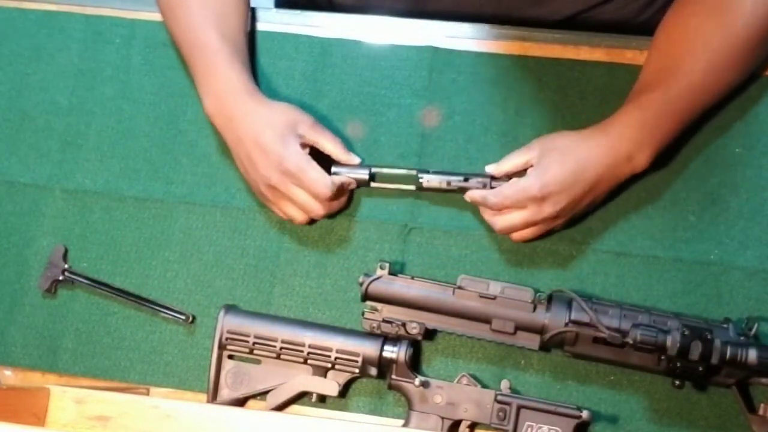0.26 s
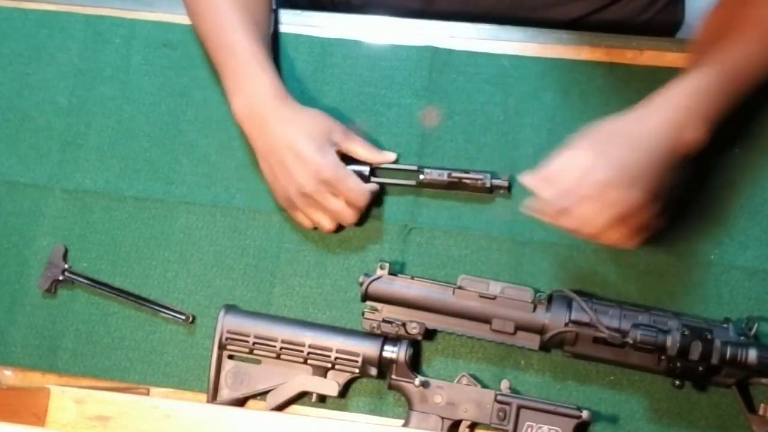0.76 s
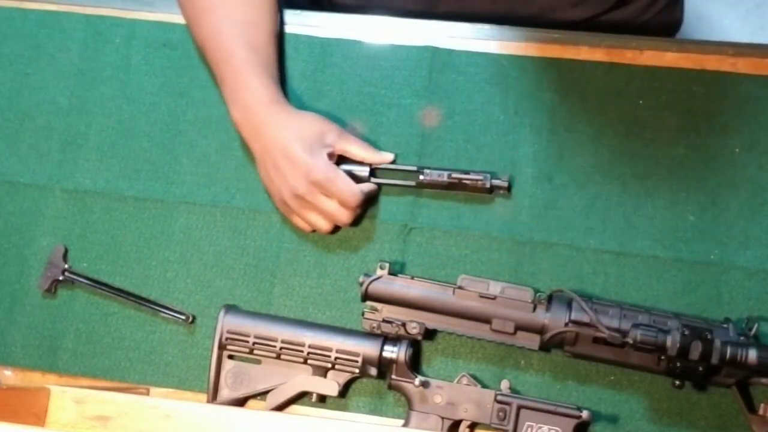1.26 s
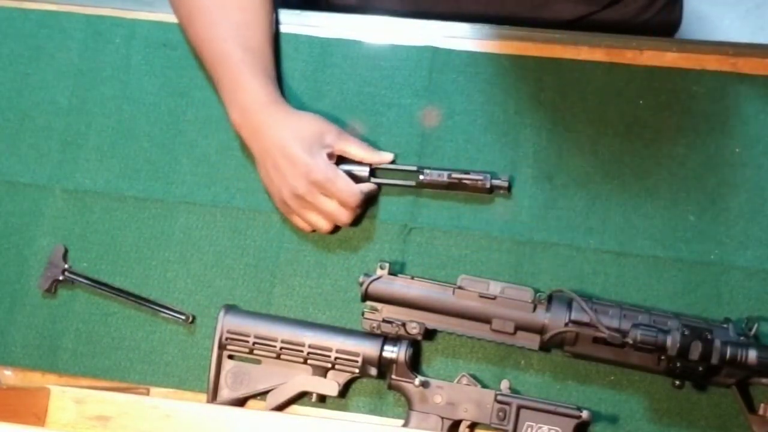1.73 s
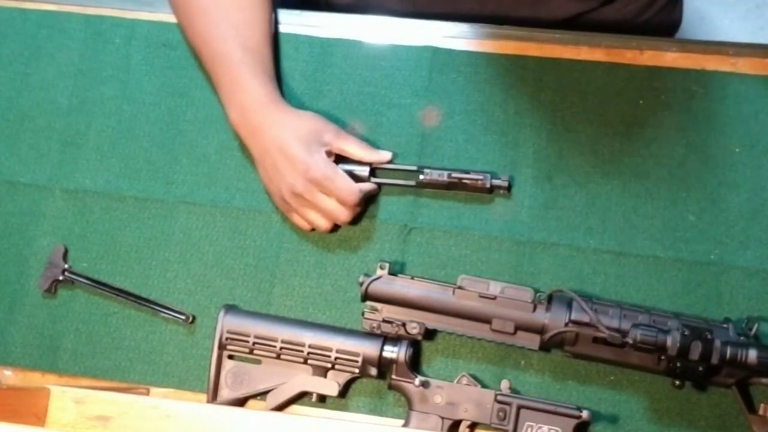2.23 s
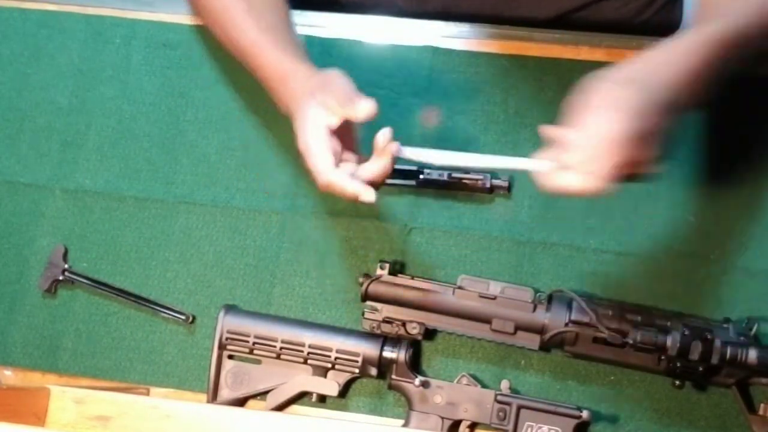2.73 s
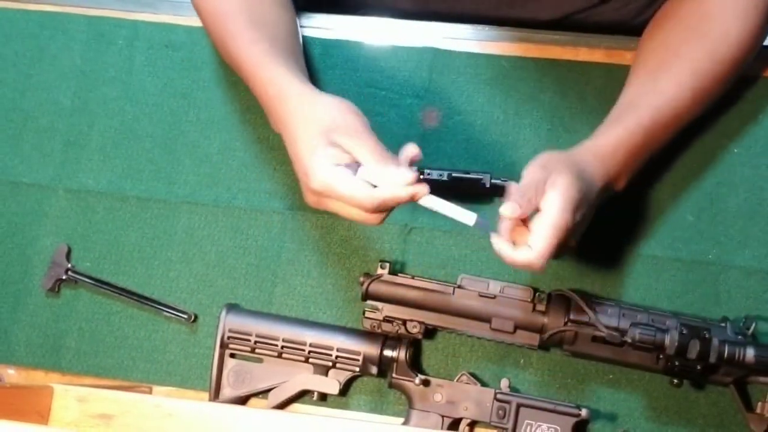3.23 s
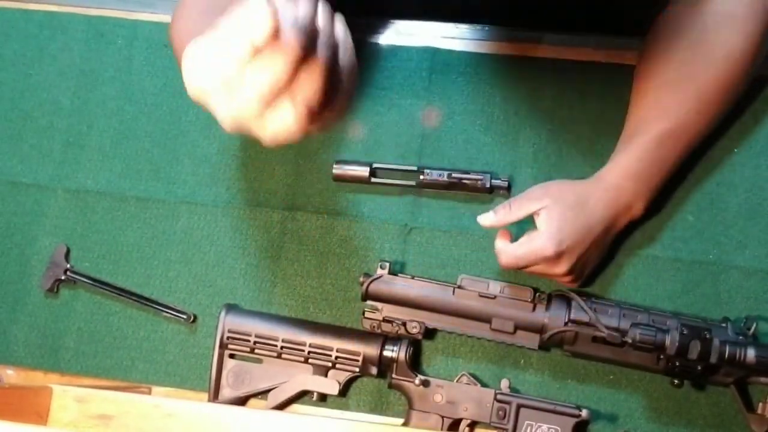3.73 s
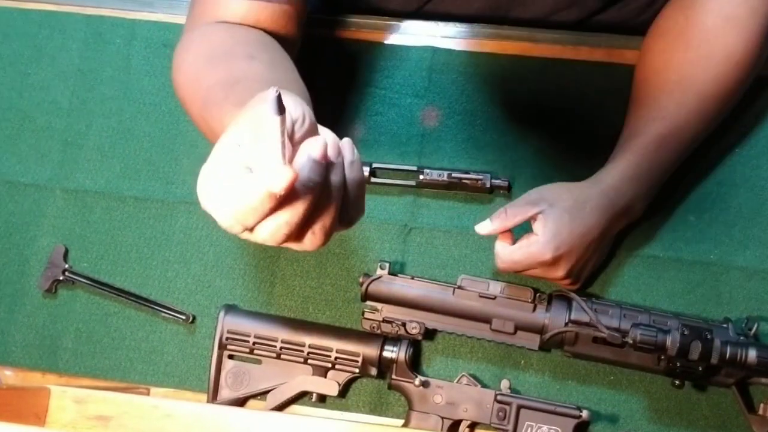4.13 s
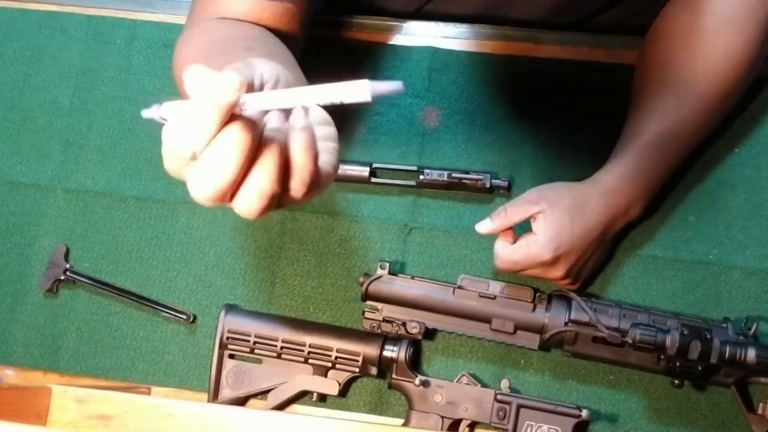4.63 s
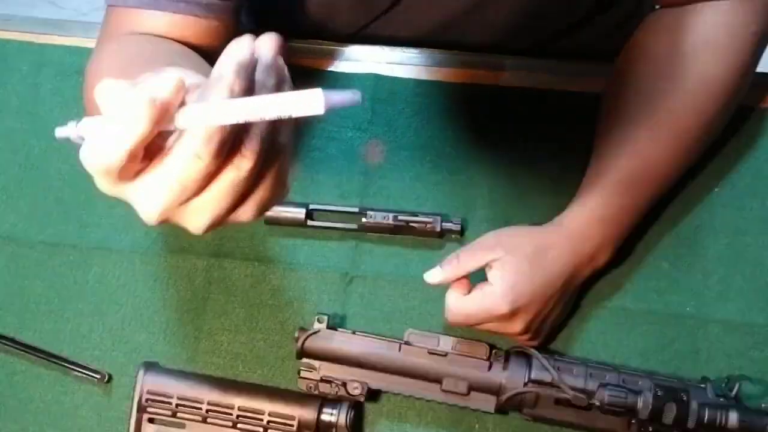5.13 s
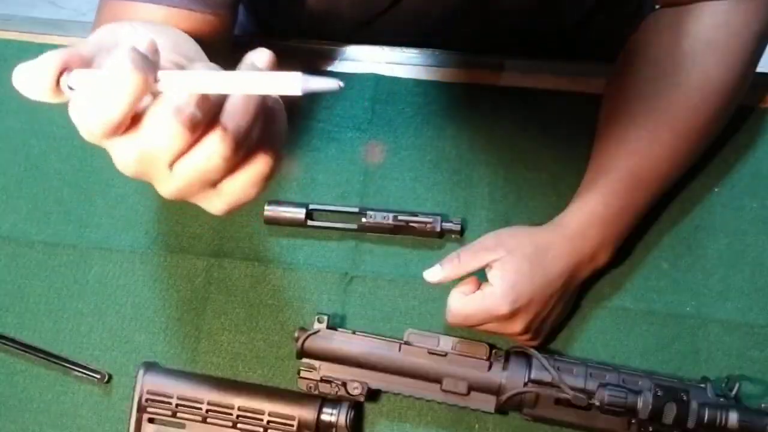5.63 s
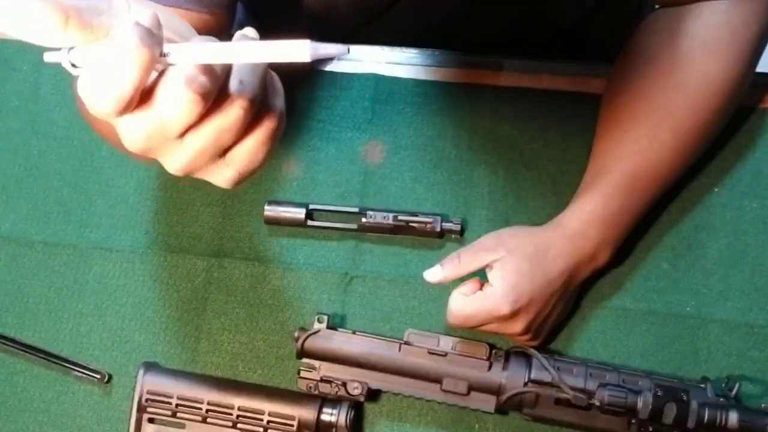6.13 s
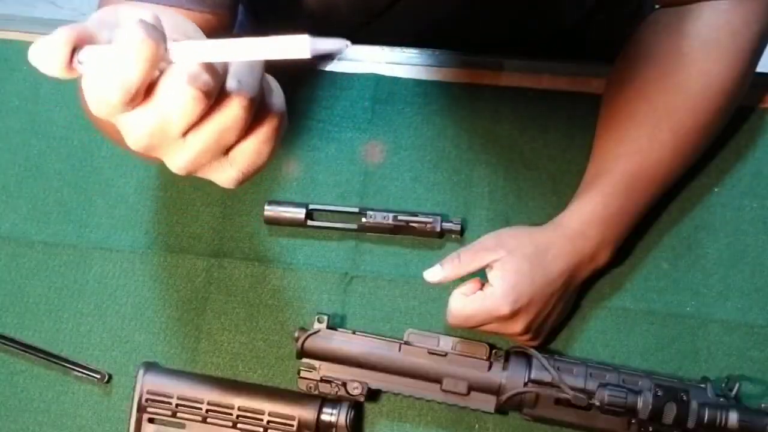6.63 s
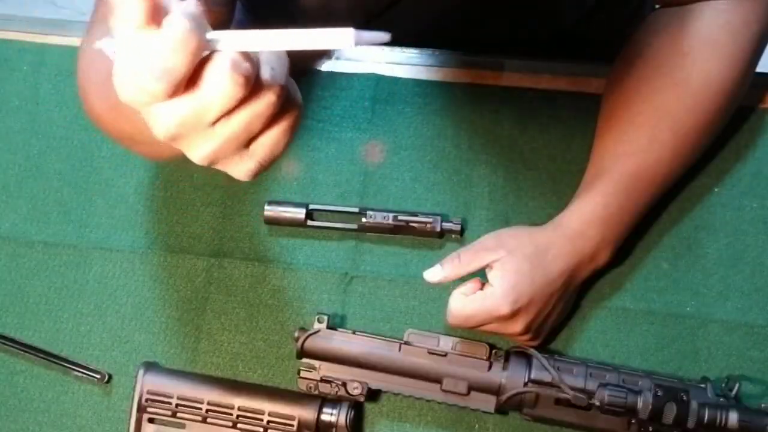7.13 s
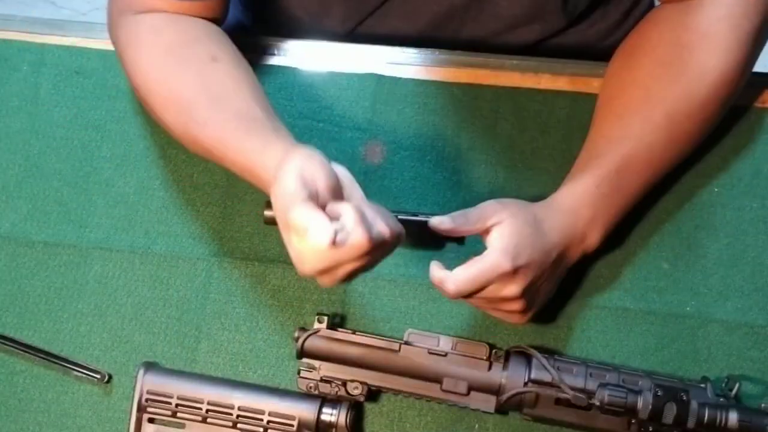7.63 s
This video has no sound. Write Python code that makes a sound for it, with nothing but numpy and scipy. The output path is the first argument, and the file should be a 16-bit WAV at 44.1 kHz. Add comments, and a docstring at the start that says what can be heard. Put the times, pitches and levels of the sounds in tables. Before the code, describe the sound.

A deep, steady hum near 60 Hz runs throughout, with soft rumble, a slow faint beating, a light rush of air and thin treble whines. At 0.8 s there is one very faint knock. From 1.2 s a hand rummages in a wooden tray: dull hollow knocks and rough sliding, thickening to the strongest woody clatter around 1.7-1.85 s. More knocks, brighter scraping and small hard ticks follow from 2.05 to 2.4 s, then fade. Two light ticks come at 2.8 s, and a barely audible knock at 3.7 s. Mostly hum remains until a tiny dry fingertip pop at 5.15 s. Crisp plastic pen clicks follow: a double at 5.63, a sharper cluster at 5.8, a single at 6.6, and a strong bright snap at 6.86 s. At 7.67 s the pen tip taps steel with a short high ring. The close stereo sound has a short, dry room echo.

```python
"""A plastic push-button pen is handled and clicked close to a two-port microphone: chatter rings its barrel.
A fingertip pops off the barrel once, and last the pen tip touches steel. Before the pen, a hand rummages
in a wooden tray off to one side; knocks and a scrape shake its modes (natural notes), and small things tick.
Behind it all, in a quiet workroom, two motors at slightly different speeds hum and beat in steady tones,
with thin treble whines; their rumble and rush of air are coloured noise."""
import sys
import numpy as np
from scipy import signal
from scipy.fft import rfft, irfft
from scipy.io import wavfile
from scipy.ndimage import uniform_filter1d

SR = 44100
rng = np.random.default_rng(int(sys.argv[2]) if len(sys.argv) > 2 else 0)


def master(y):
    """Save y as 16-bit WAV."""
    cut = np.clip(np.atleast_2d(y).T, -1, 1)
    pcm = np.round(cut * 32767)  # scale
    wavfile.write(sys.argv[1], SR, pcm.astype(np.int16))


N = 346934
TIME = np.arange(N) / SR
BINS = np.maximum(np.arange(N // 2 + 1) * SR / N, 1)   # the pitches of a spectrum, Hz

# the room's echoes by pitch: f/Hz, t60/s (time to fade by 60 dB), relative level/dB
ROOM = [(200, 0.1, -16), (595, 0.11, 0), (1700, 0.16, 1), (3400, 0.13, -4), (6800, 0.07, -3.5),
        (13500, 0.19, -0.5)]
ROOM_APART_HZ = 900   # below this the echoes grow alike in the two ports
TRAY_ROOM_DB, PEN_ROOM_DB, POP_ROOM_DB = -0.5, -0.5, -9   # how strongly each source feeds the echoes

# the base tone of the first motor: t/s, level/dB
HUM_LEVEL = [(0.15, -39.5), (2.88, -41.5), (4.46, -41), (4.65, -40.5), (6.96, -39), (7.7, -39.5)]
HUM_HZ, HUM_LAG_RAD = 59.286, 0.24   # the left port lags
# further steady tones of both motors, the lowest from the second: f/Hz
OVERTONE_HZ = [118.83, 296.4, 533.8, 592.9]
# the same tones: level/dB, wavering/dB
OVERTONES = [(-70, 1), (-77.5, 7.5), (-97.5, 10.5), (-91, 6)]
BEATING_HZ = 178.26   # a tone of the second motor, just above the first one's third overtone, beats with it
THIRD_DB, BEATING_DB, PAIR_FADE_DB_PER_S, BEAT_DIP_S = -68, -62.5, 1, 2.75   # levels hold at the dip
# colour of the low rumble: f/Hz, relative level per Hz/dB
RUMBLE_COLOUR = [(12, -20), (25, -3.5), (40, 3.5), (80, -1), (110, -7), (160, -8), (250, -9), (310, -9.5),
                 (400, -22), (630, -27), (1000, -33), (1300, -41), (2200, -44)]
# colour of the rush of air: f/Hz, relative level per Hz/dB
RUSH_COLOUR = [(880, -29), (1500, -22.5), (2370, -22), (3130, -24.5), (3600, -10.5), (4710, -14),
               (4860, -10.5), (5260, -11), (6350, -8), (6680, -3), (7090, -10), (7530, -9), (9180, -14.5),
               (12600, -13), (16200, -18.5)]
RUMBLE_DB, RUSH_DB = -57.5, -60.5
# centres of the narrow whines: f/Hz
WHINE_HZ = [3973, 4980, 5513, 5556, 5960, 6155, 6461, 6641, 6699, 6761, 6850, 7057, 7175, 8016, 8253, 8710]
# the same whines, noise in narrow resonances: width/Hz, level/dB
WHINES = [(12.2, -102), (28.4, -72), (15.9, -75), (14.9, -83), (36, -72), (79, -74), (40.4, -78),
          (11.5, -81), (11.8, -75.5), (15, -73.5), (48.3, -60), (12, -83.5), (12.3, -73.5), (15.4, -80),
          (16.8, -77.5), (19.9, -103)]
# how alike the steady noise is in the two ports: f/Hz, likeness (1 same, 0 unrelated, -1 opposite)
LIKENESS = [(60, 1), (150, 0.75), (380, 0.44), (950, -0.35), (2380, 0.029), (5980, 0.038), (15000, -0.047)]
# how the steady noise leans to one side: f/Hz, left minus right/dB
LEAN = [(60, -4.5), (110, 3), (200, -2), (380, -2.5), (700, -3), (1290, 1), (2380, 2), (4400, -3.5),
        (8120, -5.5), (15000, -2.5)]

# knocks in the tray: t/s, drive level/dB, focus/octaves above 1 kHz, contact/ms,
# lower boom level/dB, upper boom level/dB
KNOCKS = [(0.824, -60, 0.82, 27, -69, -69), (1.242, -45, -0.09, 18, -52, -54),
          (1.272, -42.5, -1, 4.5, -46, -54), (1.359, -55, -0.79, 5.6, -53, -59),
          (1.377, -49.5, 0.67, 21, -63, -50), (1.406, -39, -0.15, 4.6, -57, -49),
          (1.429, -44, -.3, 6, -55, -51), (1.518, -58, -1, 8.8, -51.5, -80),
          (1.542, -59, -0.26, 8.1, -56, -76), (1.683, -52, -.6, 10, -40.5, -62),
          (1.701, -41.5, -0.22, 27, -42, -56), (1.717, -34.5, 0, 9.3, -32.5, -36),
          (1.727, -40, 0.13, 9.8, -44, -38), (1.745, -41, 0.69, 7.7, -52, -49),
          (1.756, -32, 0.089, 8.9, -36, -51), (1.7635, -30, 0.46, 6.7, -26, -30.5),
          (1.771, -33, -0.14, 3.6, -27.5, -53), (1.813, -34, 0.37, 6.1, -37, -35),
          (1.842, -40, -0.3, 9.5, -38, -47), (1.857, -52, -1, 4.4, -42, -64),
          (2.053, -36.5, 0.58, 6.5, -44, -47), (2.063, -50, 0, 8, -49, -45.5),
          (2.092, -44, -0.35, 5.1, -46, -52), (2.123, -63, .5, 10, -65, -54), (2.135, -64, 0, 14, -70, -59),
          (2.15, -52, .3, 8.7, -68, -57), (2.175, -52, 0.2, 11, -63, -59), (2.207, -44, 0.13, 6, -52, -47),
          (2.243, -51, 0.76, 6.6, -60, -64), (2.258, -46, 0.74, 12, -47, -53),
          (2.275, -49, 1.2, 8, -54, -65), (2.296, -41.5, 1.2, 7.4, -58, -50),
          (2.337, -47.5, 0.41, 6.1, -49, -55), (2.365, -54, -0.05, 10, -64, -62),
          (2.401, -39.5, 1, 2.7, -46, -54), (2.688, -59, 0.78, 12, -80, -78),
          (3.697, -53, .2, 4.1, -82, -78)]
# sliding in the tray: t/s, pressure level/dB, focus/octaves above 1 kHz
SCRAPE = [(1.2, -72, -0.6), (1.288, -59, 0), (1.41, -59.5, -1.5), (1.62, -63, -3), (1.72, -67, 2),
          (1.92, -68.5, -0.4), (2.02, -62.5, 0), (2.096, -57, 0.5), (2.2, -60, 0.4), (2.27, -56.5, 0.5),
          (2.325, -62, 1.1), (2.388, -53, 1.4), (2.426, -69.5, -2), (2.5, -100, 11), (2.62, -76.5, 1),
          (2.862, -79, 2), (2.95, -76, -0.5)]
# the tray's modes: f/Hz
TRAY_HZ = [200, 300, 490, 535, 680, 781, 950, 1168, 1450, 1840, 2200, 2700, 3200, 3900, 4700, 5700, 7500]
# the same modes: gain level/dB, longest t60/s
TRAY_MODES = [(-13, 0.044), (3, 0.035), (-2, 0.022), (-6, 0.078), (-11, 0.031), (2.5, 0.016), (-24, 0.087),
              (-15, 0.053), (-3, 0.0037), (-13.5, 0.0074), (-2.5, 0.0061), (-1.5, 0.0058), (-5, 0.0052),
              (4.5, 0.0031), (-2.5, 0.0069), (10, 0.0061), (12, 0.0028)]
# borders between the low, upper and bright groups of modes: f/Hz
GROUP_EDGES_HZ = [630, 1300]
# how well scraping drives each group: level/dB
SCRAPE_COUPLING_DB = (-22, -23, -14.5)
# how well knocking drives each group: level/dB
KNOCK_COUPLING_DB = (-21, -28, -17)
TRAY_FOCUS_DB = 4.5   # loss one octave off the focus, growing with the square
SLIPS_PER_S, SLIP_SPREAD_DB = 500, 5.5   # the scrape has a run of separate, uneven slips
SLIDE_SHIFT_DB = 4   # each mode comes and goes as the contact moves
# the two hollow notes of the tray: f/Hz
BOOM_HZ = (512, 790)
BOOM_SHIFT = .035   # share by which the things inside detune them from knock to knock
BOOM_RISE_MS, BOOM_FOLLOWS = 2.55, 0.14   # swell of a boom, plus a share of the contact
TRAY_LAG_S = 0.000252   # the right port hears the tray this much later

# ticks in the tray, then pen clicks, last the pen tip touching steel: t/s, drive level/dB,
# focus/octaves above 1 kHz, chatter/ms, extra treble level/dB, ring f/Hz, ring level/dB
TICKS = [(1.7218, -40, 2.9, 1.2, -3, 1830, -38.5), (1.765, -36, 1.8, 1.4, -3, 2270, -42),
         (1.8128, -35, 2.58, 1.6, 1, 7580, -42), (2.0524, -41, 1.9, 0.85, -6, 2600, -40.5),
         (2.148, -53, 1.5, .5, 0, 1900, -54), (2.2087, -44, 1.07, 0.66, -8, 2800, -50),
         (2.245, -48, 1.6, 0.6, 0, 1400, -48), (2.2655, -43, 1.8, 0.59, -2, 2680, -48),
         (2.298, -36, 1.63, 1.7, -11, 2600, -44), (2.34, -44, 1.4, .5, 0, 2600, -42),
         (2.368, -45, 1.4, .6, 0, 1160, -49), (2.3972, -33, 3.04, 0.89, 0.5, 3470, -39),
         (2.3995, -30.5, 2.78, 1.6, 0, 2320, -41.5), (2.41, -40, 2.9, 1, 0, 6300, -41),
         (2.822, -46.5, 2.86, 0.74, 4, 6960, -59), (2.852, -43, 2.74, 0.48, 2, 7000, -62),
         (5.627, -39, 2.54, 0.71, 0, 7500, -52), (5.6292, -34.5, 2.9, 0.75, 2, 7400, -47),
         (5.783, -49.5, 1.7, 0.44, 3, 2800, -68), (5.8042, -33, 2.6, 0.3, 4, 7060, -28),
         (5.8057, -28, 2.74, 0.3, 6.5, 4350, -33), (5.8074, -32, 2.1, 0.56, 11, 5330, -38),
         (6.611, -34, 2.8, 0.4, 2, 6000, -35), (6.8504, -31.5, 2.9, 1, -6, 7000, -44),
         (6.8577, -37, 2.9, 1.6, 5, 6470, -42), (6.8613, -22.5, 2.64, 0.4, 4, 6700, -37),
         (6.865, -48, 3, 0.49, 4, 4470, -48), (7.6657, -32, 2.7, 0.43, 3.5, 5250, -24.5)]
# the modes of the plastic barrel: f/Hz, gain level/dB, longest t60/s (ring() allows no less than 2 ms)
BARREL = [(864, 11, 0.0012), (1360, -4.5, 0.0042), (2520, -27, 0.0044), (2720, 4, 0.0053),
          (3280, -1.5, 0.0048), (4550, -4, .004), (5640, 6.5, 0.0021), (6710, -7.5, 0.0008),
          (6830, 6.5, .0025), (9200, -38, .002), (10500, -15, .0014), (11280, 11, .0013),
          (12700, 12, .0012), (14400, 14, .001)]
# borders of the barrel's bands: f/Hz
BARREL_BANDS_HZ = [600, 1800, 4000, 6000, 9000, 17000]
# how well ticks drive each band: level/dB
TICK_COUPLING_DB = (-33, -26.5, -24.5, -24, -24.5)
# lean of each band on top of the placing: left minus right/dB
BARREL_LEAN_DB = (4, 3.5, -3, -3.5, 2)
TICK_FOCUS_DB, TICK_FOCUS_FLOOR_DB = 22, 18   # loss one octave off a tick's focus, and its limit
PORTS_UNLIKE = 0.88   # each port's own chatter, next to 1 of shared chatter
PEN_UP_S = 2.6   # the pen is taken up
TRAY_PAN_DB, PEN_PAN_DB = 1, -2   # left minus right before and after that
# a fingertip pops off the barrel: t/s, level/dB, pull/ms, recovery/ms
POP = (5.1541, -41, .04, .2)
CUTOFF_HZ = 15780


def from_db(db):
    """Turn decibels into gain."""
    return 10 ** (np.asarray(db) / 20)


def rms_one(x):
    """Scale to an rms (average strength) of 1."""
    return x / np.sqrt(np.mean(x ** 2) + 1e-20)


def at_hz(points, hz):
    """Read a table between its points, with pitch on a log scale."""
    table = np.array(points)
    return np.interp(np.log(hz), np.log(table[:, 0]), table[:, 1])


def drift(rate):
    """Slow random wandering with strength 1; a higher rate wanders faster."""
    steps = rng.standard_normal(int(N / SR * 40) + 2)   # 40 steps a second
    width = max(int(20 / rate), 1)
    smooth = uniform_filter1d(uniform_filter1d(steps, width), width)
    return np.interp(TIME * 40, np.arange(len(steps)), rms_one(smooth))


def ring(clicks, hz, t60):
    """A mode: a click of size 1 starts a dying sine of height 1, with t60 at least 2 ms."""
    r = from_db(-60 / (max(t60, .002) * SR))
    w = 2 * np.pi * hz / SR
    return signal.lfilter([0, np.sin(w)], [1, -2 * r * np.cos(w), r * r], clicks + 1e-18)


def swell(phase):
    """Rises from 0 to a peak of 1 at phase 1, then dies away."""
    return phase * np.exp(1 - phase)


def band_pass(x, low, high):
    """Keep only the sound between two pitches."""
    return signal.sosfilt(signal.butter(2, [low, high], "band", fs=SR, output="sos"), x)


def off_focus(hz, focus, db_per_octave):
    """A contact drives modes less the further they lie from its focus."""
    return -db_per_octave * (np.log2(hz / 1000) - focus) ** 2


def add_note(out, s, hz, level_db, rise_ms, start):
    """Add one damped note that swells for rise_ms and dies."""
    age = np.arange(2000) / SR
    at = round(s * SR)
    shape = swell(age * 1e3 / max(rise_ms, .1)) ** 2
    out[at:at + len(age)] += from_db(level_db) * shape * np.cos(2 * np.pi * (hz * age + start))


def room(x):
    """Diffuse echoes: fading noise, with its own strength and decay in each octave."""
    age, tail = np.arange(SR // 2) / SR, 0
    table = np.array(ROOM)
    for hz in 150 * 2. ** np.arange(7):
        band = band_pass(rng.standard_normal((2, len(age))), hz, 2 * hz)
        alike = np.clip(1 - hz / ROOM_APART_HZ, 0, 1)
        band[1] = alike * band[0] + np.sqrt(1 - alike ** 2) * band[1]
        middle = hz * np.sqrt(2)
        t60, level_db = at_hz(table[:, :2], middle), at_hz(table[:, ::2], middle)
        # a longer decay starts lower, so it does not add energy
        tail = tail + band * from_db(level_db - 60 * age / t60) / np.sqrt(t60 * SR / 14)
    tail = tail * np.clip(age / 0.00078, 0, 1)   # the echoes build up in the first 0.78 ms
    return signal.fftconvolve(x, tail, axes=1)[:, :N]


def steady_noise(gain):
    """Stereo noise of a given colour, with likeness and lean set by pitch; the ports' average has rms 1."""
    mid, side = rfft(rng.standard_normal((2, N)))
    alike = np.clip(at_hz(LIKENESS, BINS), -1, 1)
    pair = np.sqrt(1 + alike) * mid + np.sqrt(1 - alike) * side * [[1], [-1]]
    lean = from_db(at_hz(LEAN, BINS) * np.array([[.5], [-.5]]))
    out = irfft(gain * pair * lean, N)
    return out / np.std(out.mean(axis=0))


def two_motor_hum():
    """Two motors at slightly different speeds: steady tones, and a pair that beats and opposes at the dip."""
    lag = np.array([[HUM_LAG_RAD], [0]])
    level_db = np.interp(TIME, *np.transpose(HUM_LEVEL)) + 0.071 * drift(0.78)
    out = from_db(level_db) * np.cos(2 * np.pi * HUM_HZ * TIME - .1 - lag)
    since_dip = TIME - BEAT_DIP_S
    for hz, level_db, sign in ((3 * HUM_HZ, THIRD_DB, -1), (BEATING_HZ, BEATING_DB, 1)):
        height = from_db(level_db - PAIR_FADE_DB_PER_S * since_dip)
        out += sign * height * np.cos(2 * np.pi * hz * since_dip - lag)
    for hz, (level_db, waver_db) in zip(OVERTONE_HZ, OVERTONES):
        height = from_db(level_db + waver_db * np.clip(drift(3), -2, 1.5))
        out += height * np.cos(2 * np.pi * hz * TIME + 1.13 * drift(1.03) - lag)
    return out * np.sqrt(2)   # the levels are rms


def whine():
    """Noise in narrow double resonances, whose powers add."""
    power = 0
    for hz, (width, level_db) in zip(WHINE_HZ, WHINES):
        power = power + from_db(2 * level_db) / width / (1 + ((BINS - hz) / width * 2) ** 2) ** 2
    return np.sqrt(power.sum() * SR / N * 4 / np.pi) * steady_noise(np.sqrt(power))


def motors():
    """Hum and thin whine over noise coloured as low rumble and a rush of air."""
    out = two_motor_hum()
    out += from_db(RUMBLE_DB) * steady_noise(from_db(at_hz(RUMBLE_COLOUR, BINS)))
    out += from_db(RUSH_DB) * steady_noise(from_db(at_hz(RUSH_COLOUR, BINS)))
    return out + whine()


def grit(per_s, spread):
    """Random tiny contacts of uneven size; rms 1."""
    sizes = from_db(spread * np.minimum(rng.exponential(1, N), 4)) * rng.choice([-1, 1], N)
    return rms_one(sizes * (rng.random(N) < per_s / SR))


def tray():
    """Knocks are short bursts of contacts, the scrape a long one; both drive low, upper and bright modes."""
    rough, slips = grit(5000, 3.8), grit(SLIPS_PER_S, SLIP_SPREAD_DB)
    ms, out = np.arange(2000) / SR * 1e3, np.zeros(N)
    chance = rng.standard_normal((len(KNOCKS), len(TRAY_MODES)))   # dB, by knock and mode
    times, pressure_db, slide_focus = np.transpose(SCRAPE)
    slide_db = np.interp(TIME, times, pressure_db, -140, -140) + 0.9 * drift(15)   # uneven pressure
    slide_focus = np.interp(TIME, times, slide_focus)
    for k, (hz, (level_db, t60)) in enumerate(zip(TRAY_HZ, TRAY_MODES)):
        group = np.searchsorted(GROUP_EDGES_HZ, hz)
        grains = np.roll(rough, int(hz))   # shifted, so that the modes do not move in step
        scrape_db = slide_db + SCRAPE_COUPLING_DB[group] + off_focus(hz, slide_focus, TRAY_FOCUS_DB)
        drive = from_db(scrape_db + SLIDE_SHIFT_DB * drift(10)) * (0.68 * grains + 0.78 * slips)
        for (s, knock_db, focus, contact_ms, *_), own_db in zip(KNOCKS, chance[:, k]):
            at = round(s * SR)
            force_db = knock_db + KNOCK_COUPLING_DB[group] + off_focus(hz, focus, TRAY_FOCUS_DB) + own_db
            # the force swells for a third of the contact, then fades
            force = from_db(force_db) * swell(3 * ms / max(contact_ms, .5)) ** 2
            drive[at:at + len(ms)] += force * grains[at:at + len(ms)]
        out += from_db(level_db) * ring(drive, hz, min(t60, 60 / hz))
    return out


def booms():
    """Every knock also sounds the two hollow notes of the tray, a little detuned each time."""
    out = np.zeros(N)
    chances = rng.standard_normal((len(KNOCKS), 2, 2))
    for (s, _, _, contact_ms, *levels_db), chance in zip(KNOCKS, chances):
        rise_ms = BOOM_RISE_MS + BOOM_FOLLOWS * contact_ms
        for hz, level_db, (shift, start) in zip(BOOM_HZ, levels_db, chance):
            add_note(out, s, hz * (1 + BOOM_SHIFT * shift), level_db, rise_ms, start)
    return out


def pop():
    """A sharp pull, then a push that recovers more slowly."""
    s, level_db, pull_ms, recovery_ms = POP
    ms = (TIME - s) * 1e3
    fade = np.exp(-np.abs(ms) / np.where(ms < 0, 2 * pull_ms, recovery_ms))
    return from_db(level_db) * 2 * np.tanh(ms / pull_ms) * fade


def tick_rings():
    """Each tick has one short note of its own, which lasts longer with longer chatter."""
    out = np.zeros(N)
    for (s, _, _, chatter_ms, _, hz, level_db), start in zip(TICKS, rng.random(len(TICKS))):
        add_note(out, s, hz, level_db, 0.95 * chatter_ms, start)
    pan_db = np.where(TIME < PEN_UP_S, TRAY_PAN_DB, PEN_PAN_DB)
    return out * from_db(pan_db * np.array([[.5], [-.5]]))


def ticks():
    """Each tick is brief chatter into the heavily damped barrel modes, coloured by band and placed."""
    s, drive_db, focus, chatter_ms, treble_db = np.transpose(TICKS)[:5]
    pan_db = np.where(s < PEN_UP_S, TRAY_PAN_DB, PEN_PAN_DB)
    chatter_ms = np.maximum(chatter_ms, .1)[:, None]
    fade = 1.37 * swell(np.arange(400) / SR * 1e3 / chatter_ms) ** 1.42 / np.sqrt(chatter_ms)
    shared, *own = rng.standard_normal((len(s), 3, 400)).transpose(1, 0, 2)
    at = (s * SR).round().astype(int)[:, None] + np.arange(400)
    out = np.zeros((2, N))
    bands = zip(BARREL_BANDS_HZ, BARREL_BANDS_HZ[1:], TICK_COUPLING_DB, BARREL_LEAN_DB)
    for low, high, coupling_db, lean_db in bands:
        tilt_db = off_focus(np.sqrt(low * high), focus, TICK_FOCUS_DB)
        tilt_db = np.maximum(tilt_db, -TICK_FOCUS_FLOOR_DB)
        if high == BARREL_BANDS_HZ[-1]:
            tilt_db = tilt_db + treble_db
        clicks = np.zeros((2, N))
        for side, sign in enumerate((.5, -.5)):   # the ports hear the barrel from unlike angles
            level_db = drive_db + tilt_db + coupling_db + sign * (pan_db + lean_db)
            chatter = (shared + PORTS_UNLIKE * own[side]) * fade
            np.add.at(clicks[side], at, chatter * from_db(level_db)[:, None])
        rung = np.zeros((2, N))
        for hz, gain_db, t60 in BARREL:
            if low < hz < high:
                rung += from_db(gain_db) * ring(clicks, hz, min(t60, 16 / hz))
        out += band_pass(rung, low, high)
    return out


def scene():
    """Motors, tray, pen and the room's echoes; the tray reaches the left port first."""
    knocks = tray() + booms()
    far = np.stack([knocks, np.interp(TIME - TRAY_LAG_S, TIME, knocks)])
    near = ticks() + tick_rings()
    to_room = from_db(POP_ROOM_DB) * pop() + from_db(TRAY_ROOM_DB) * far + from_db(PEN_ROOM_DB) * near
    return motors() + far + near + pop() + room(to_room)


def record(dry):
    """The top is cut steeply."""
    return signal.sosfilt(signal.ellip(12, .5, 60, CUTOFF_HZ, fs=SR, output="sos"), dry)


dry = scene()
out = record(dry)
master(out)
```